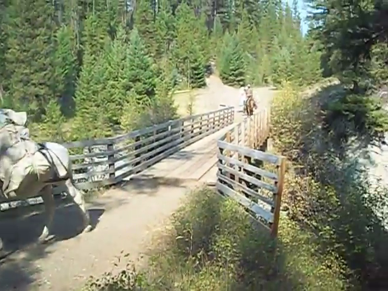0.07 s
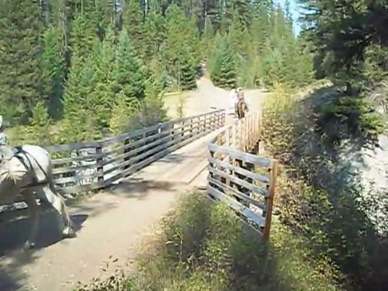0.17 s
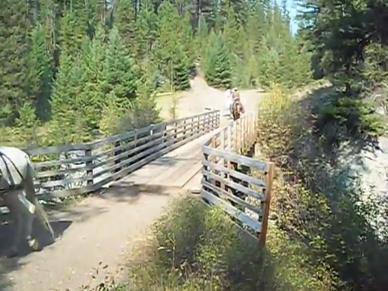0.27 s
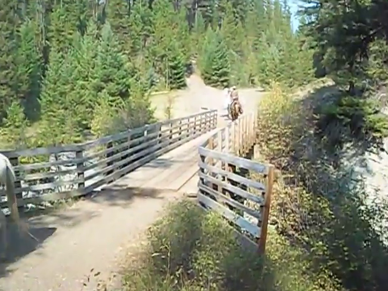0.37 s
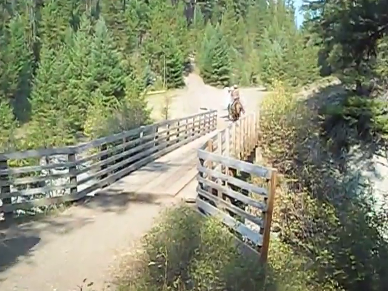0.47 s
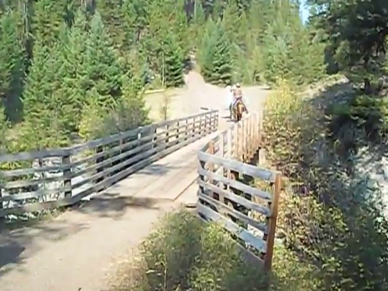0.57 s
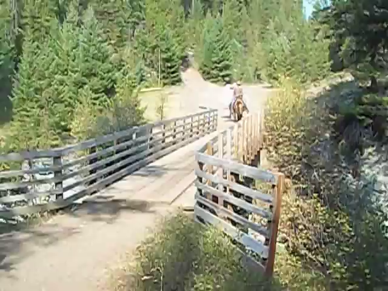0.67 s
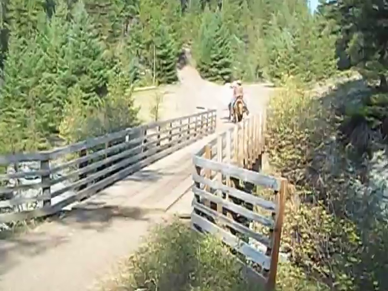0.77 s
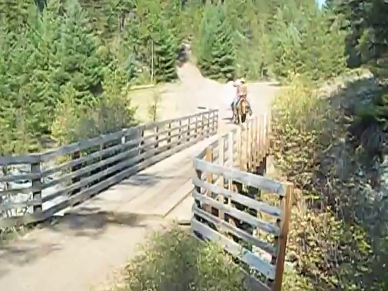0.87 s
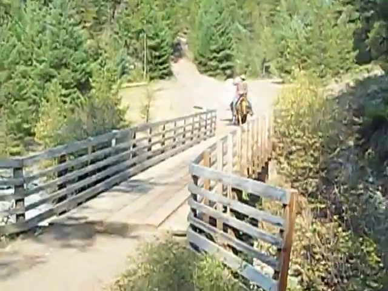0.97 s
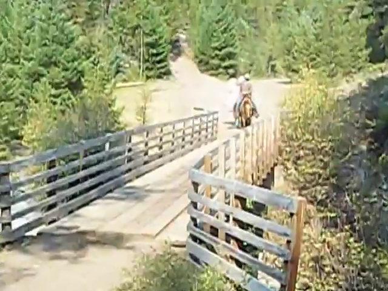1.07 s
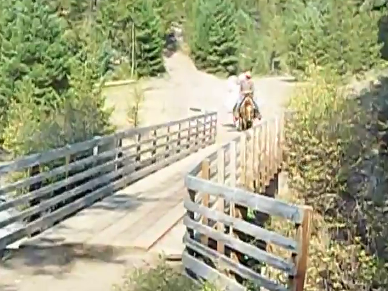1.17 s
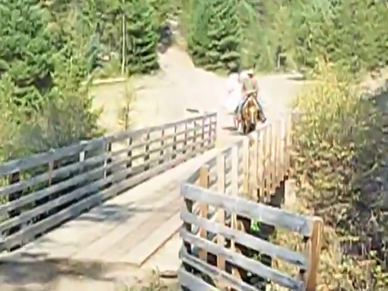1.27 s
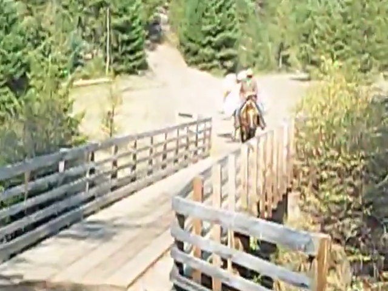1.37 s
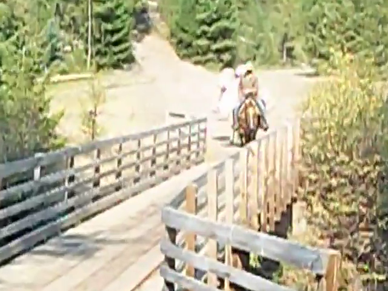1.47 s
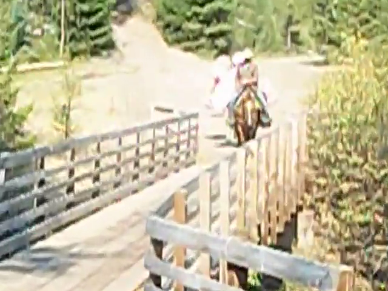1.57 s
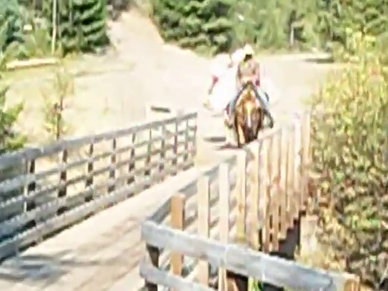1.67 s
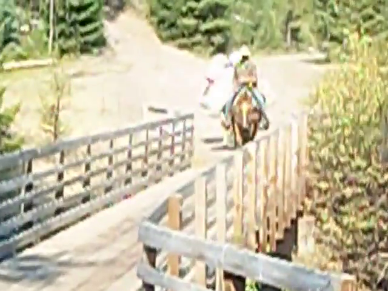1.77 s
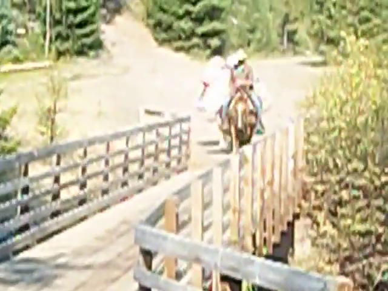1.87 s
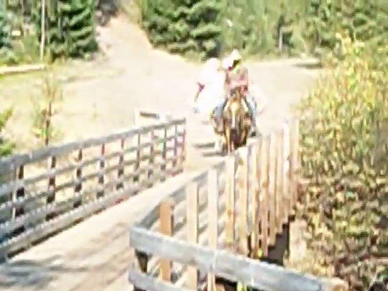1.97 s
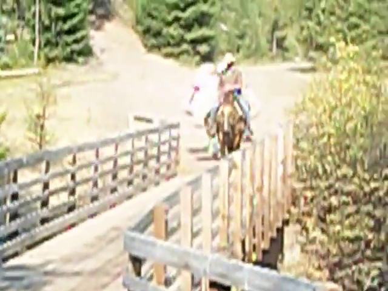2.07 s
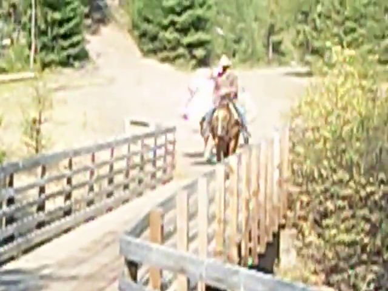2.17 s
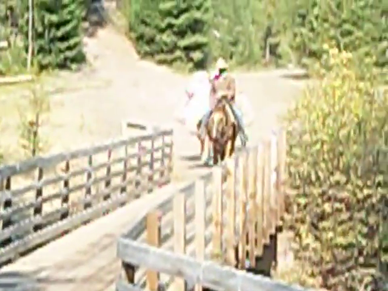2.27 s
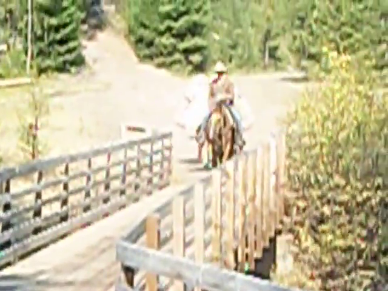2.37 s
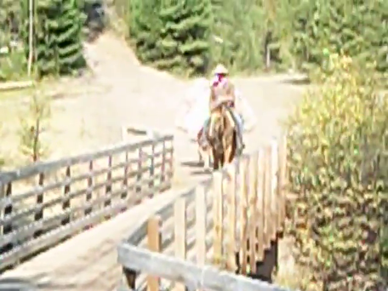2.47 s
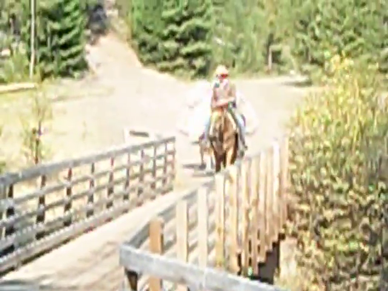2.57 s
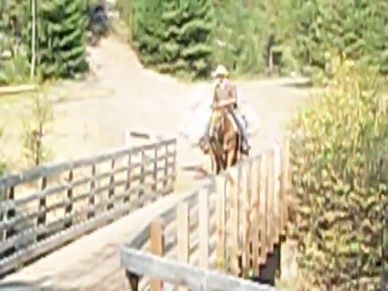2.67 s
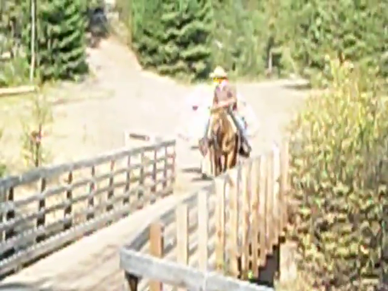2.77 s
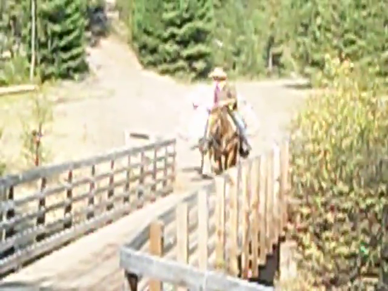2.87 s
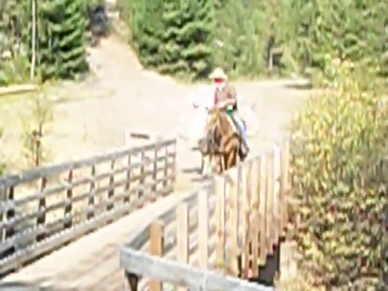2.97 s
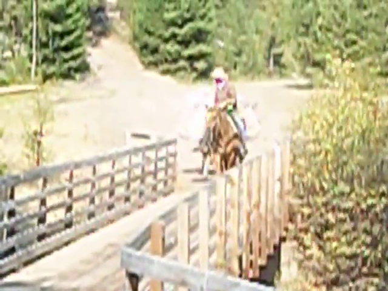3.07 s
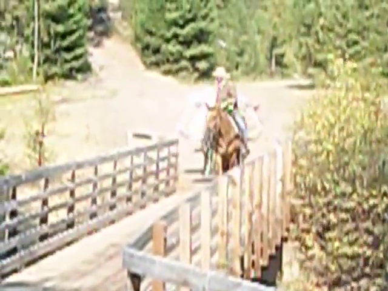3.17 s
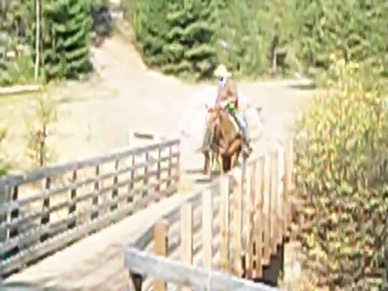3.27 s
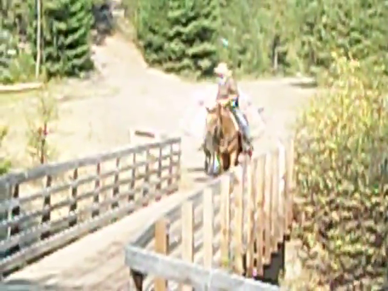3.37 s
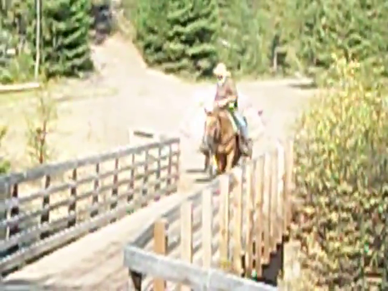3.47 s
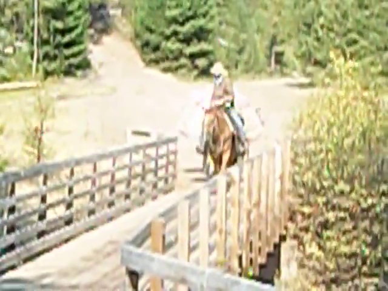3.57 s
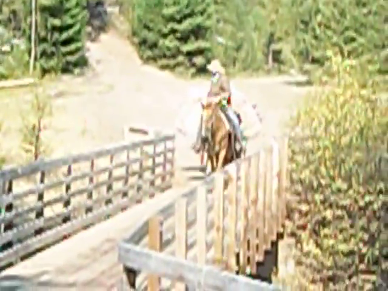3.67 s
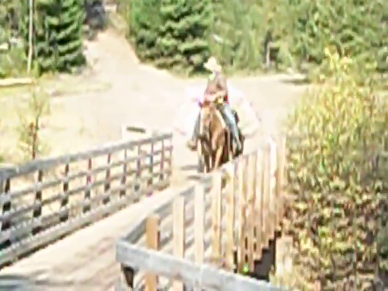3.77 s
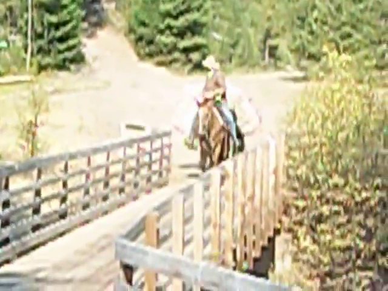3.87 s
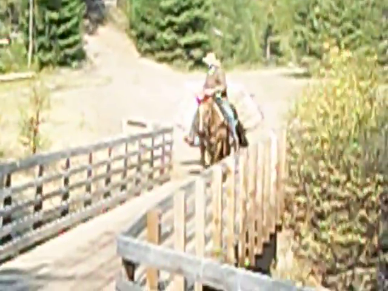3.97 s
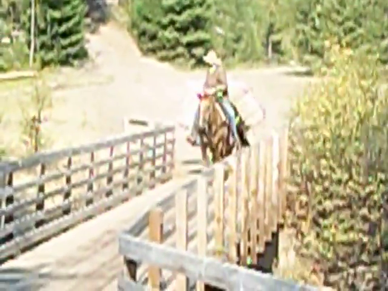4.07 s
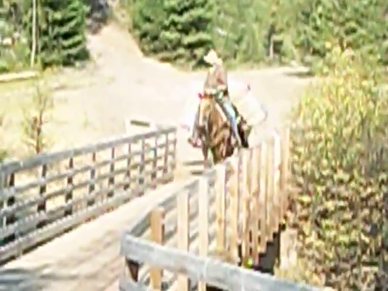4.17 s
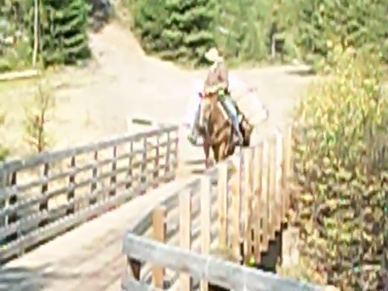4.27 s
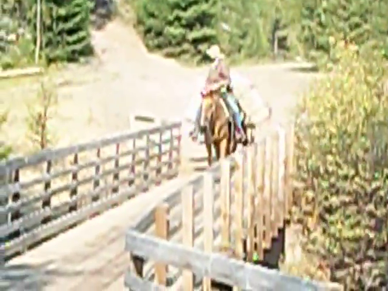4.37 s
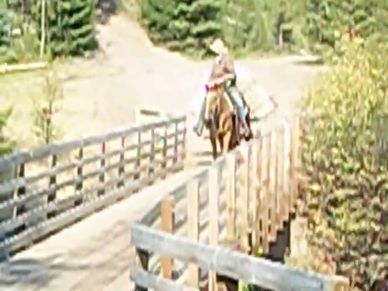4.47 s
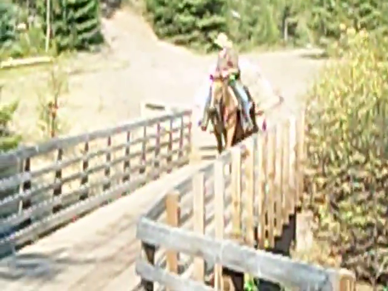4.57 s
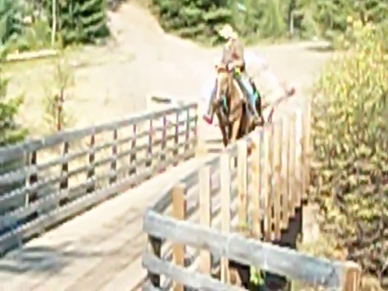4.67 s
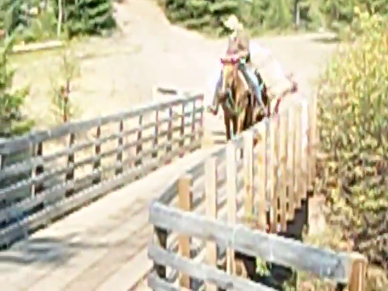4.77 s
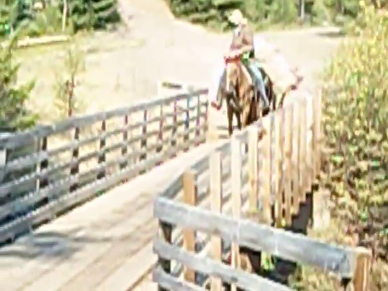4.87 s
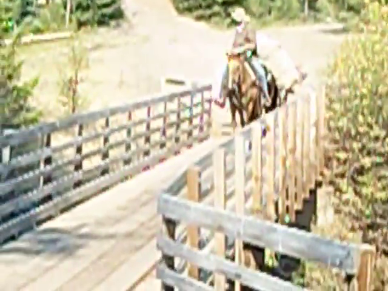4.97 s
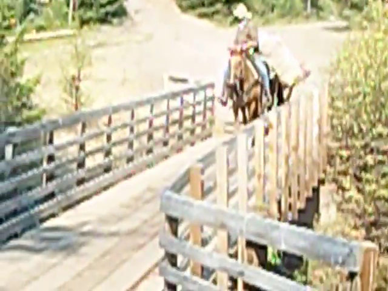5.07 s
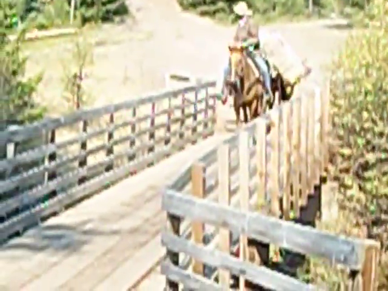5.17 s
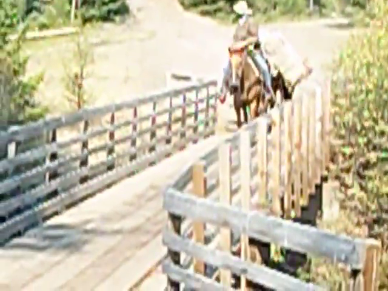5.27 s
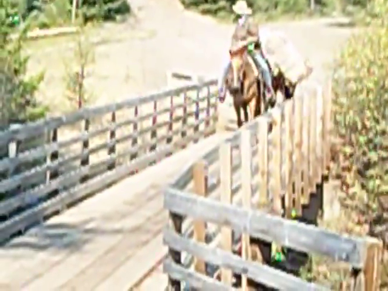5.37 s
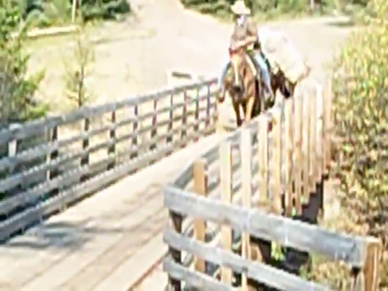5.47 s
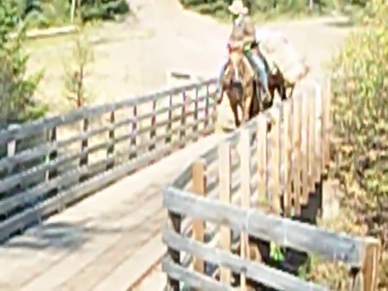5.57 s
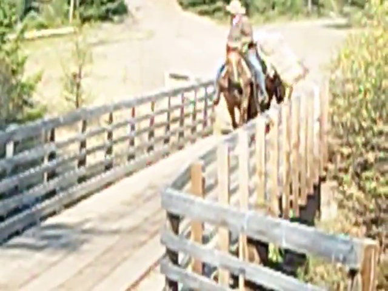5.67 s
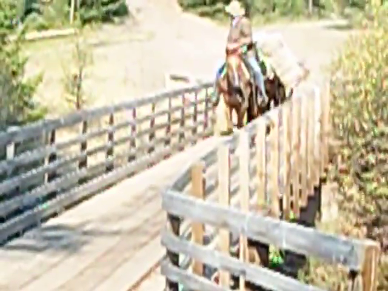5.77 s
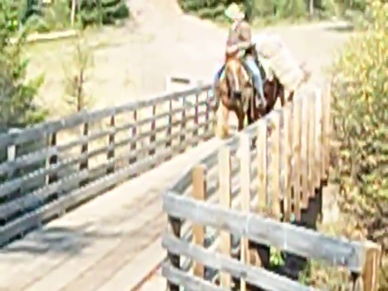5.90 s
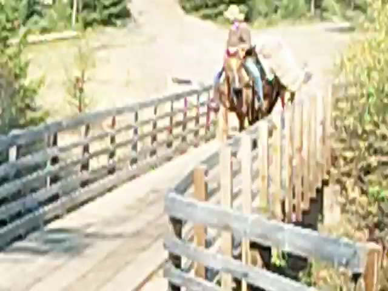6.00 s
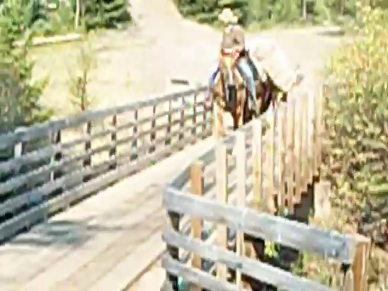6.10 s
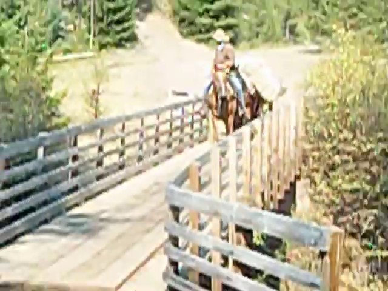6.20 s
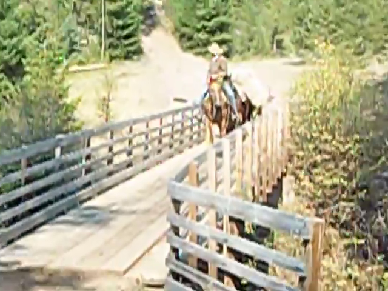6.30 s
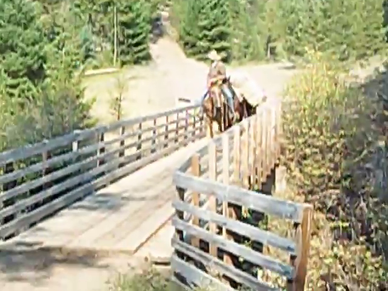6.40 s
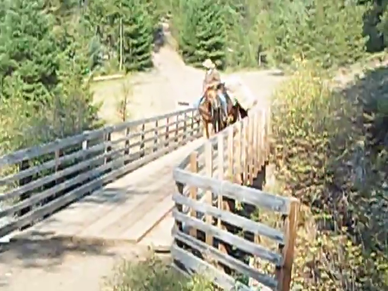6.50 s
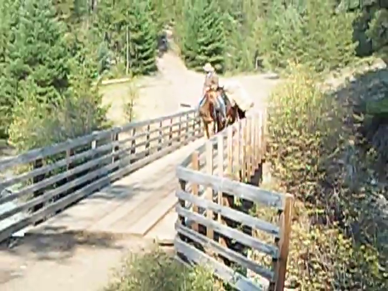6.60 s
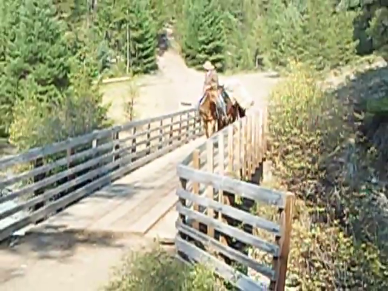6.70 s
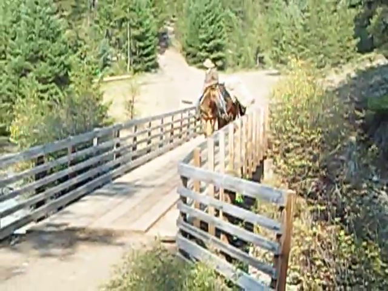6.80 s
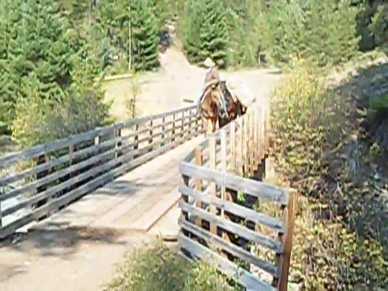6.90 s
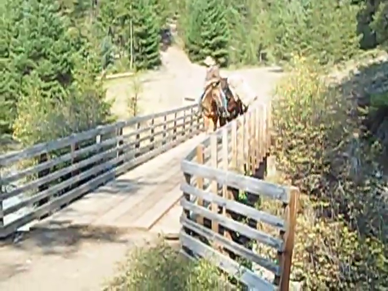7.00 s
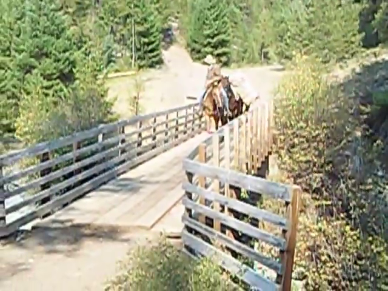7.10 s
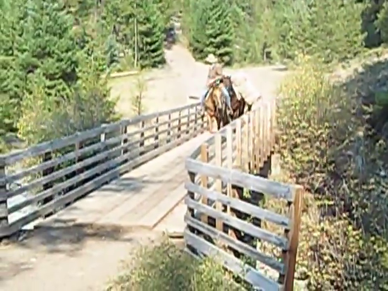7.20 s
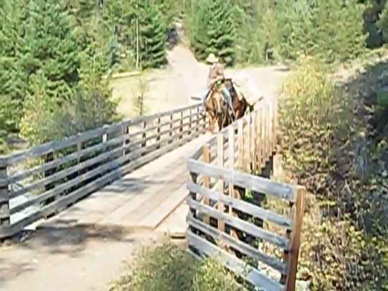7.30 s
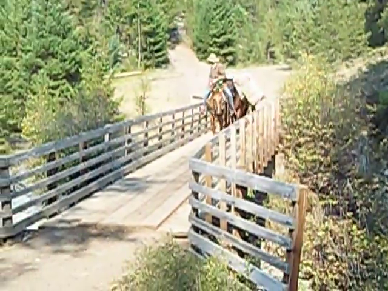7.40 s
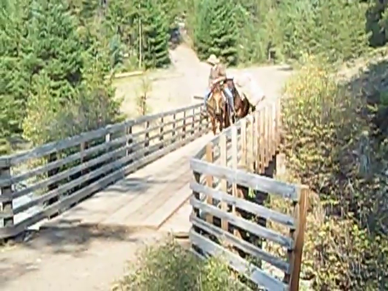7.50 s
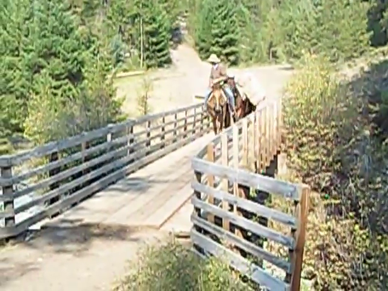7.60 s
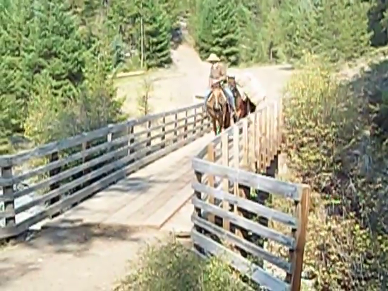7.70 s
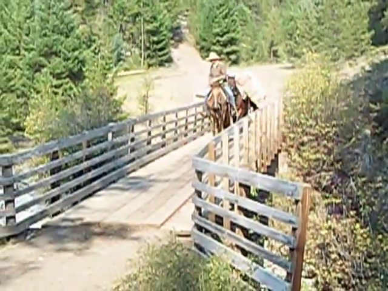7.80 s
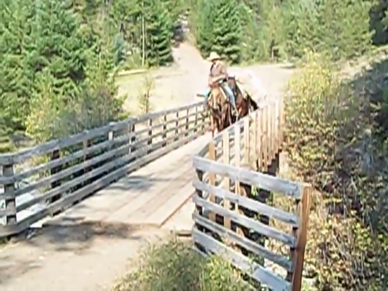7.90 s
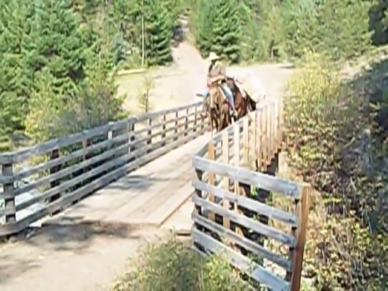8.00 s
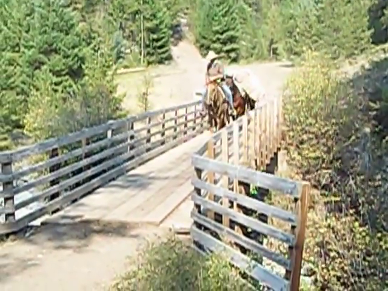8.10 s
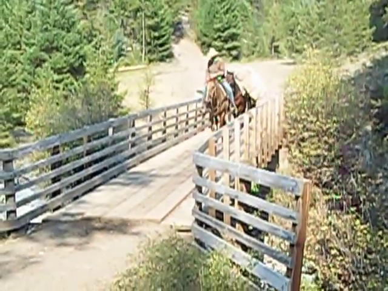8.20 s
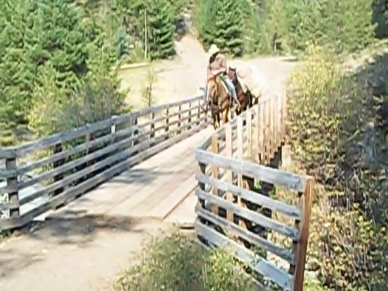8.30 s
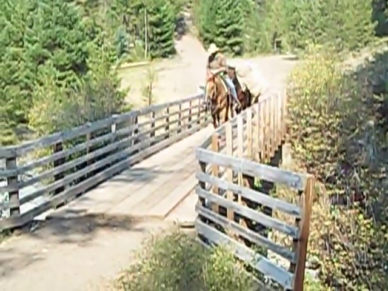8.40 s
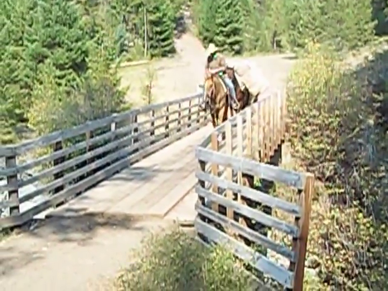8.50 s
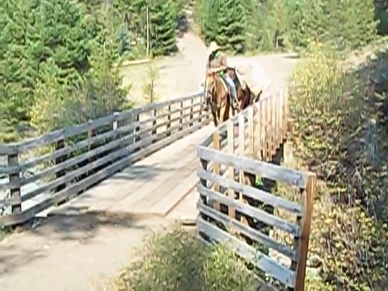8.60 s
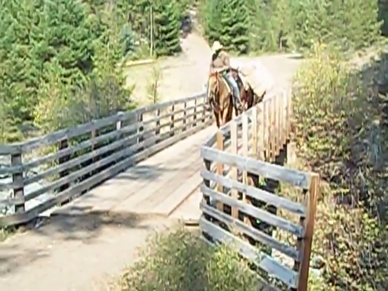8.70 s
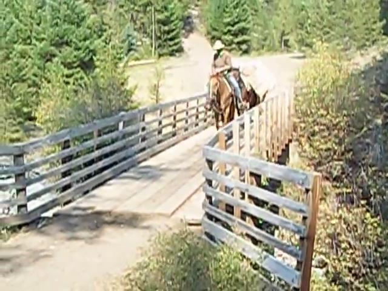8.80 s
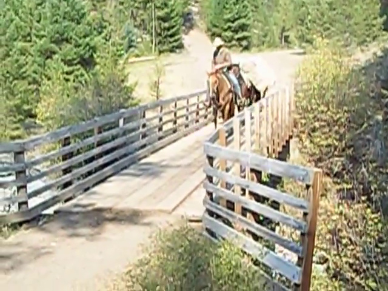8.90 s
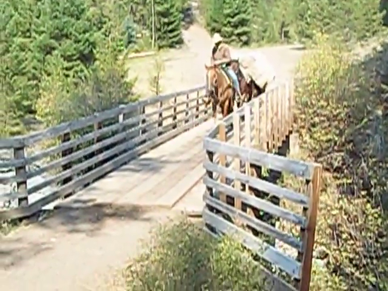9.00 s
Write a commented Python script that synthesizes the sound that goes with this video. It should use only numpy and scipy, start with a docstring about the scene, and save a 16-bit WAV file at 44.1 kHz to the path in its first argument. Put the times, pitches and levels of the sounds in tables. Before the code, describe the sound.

Outdoors by a creek, several horses walk on a plank bridge at an unhurried, overlapping pace. Faint gravel crunches and very loud close metal snaps open the scene; two more isolated clacks follow later. Distant soft hoof knocks gradually become heavy, booming thuds with woody clops, the deck rumbling underneath. Pebbly ticks and dry toe taps are scattered among them. The small microphone has little deep bass and no airy treble.

```python
"""Horses walk on a wooden plank bridge over a creek, just after a pack horse leaves over gravel.
Each hoof is a short blow that rings resonances: a hollow knock and a deeper thud.
Grit and sharp ticks sound under the hooves, toes tap the planks, and the forest sends back a dull echo.
Sharp clacks close by, perhaps a strap buckle, are snaps of ringing metal.
The creek is shaped noise, the gravel a crowd of tiny clicks; a small microphone narrows it all."""
import sys
import numpy as np
from scipy import signal
from scipy.fft import rfft, irfft
from scipy.io import wavfile
from scipy.ndimage import uniform_filter1d

SR = 44100
rng = np.random.default_rng(int(sys.argv[2]) if len(sys.argv) > 2 else 0)


def file_out(sig):
    """Save sig as 16-bit WAV at sys.argv[1]."""
    # one column per channel
    cols = np.atleast_2d(sig).T
    # limit, then scale
    lim = np.clip(cols, -1, 1)
    pcm = np.round(lim * 32767).astype(np.int16)
    wavfile.write(sys.argv[1], SR, pcm)


N = 399105  # length in samples, about 9 seconds
LEAD_S = 0.03  # time kept before each blow for the scuff


def from_db(db):
    """Turn decibels into a gain."""
    return 10 ** (np.asarray(db) / 20)


def rms_one(x):
    """Scale a sound to an average (rms) level of 1."""
    return x / np.sqrt(np.mean(x ** 2) + 1e-20)


def peak_one(x, size):
    """Scale a sound so that its loudest stretch of `size` samples has rms 1."""
    return x / np.sqrt(uniform_filter1d(x ** 2, size).max() + 1e-20)


def lowpass(x, order, hz):
    """Soften the treble above hz."""
    return signal.sosfilt(signal.butter(order, hz, fs=SR, output="sos"), x)


def add(out, s, sound):
    """Mix a sound in, starting at time s in seconds."""
    start = int(np.clip(round(s * SR), 0, N - 1))
    out[start:start + len(sound)] += sound[:N - start]


def drift(rate):
    """Wander at random: `rate` new values a second, joined by straight lines."""
    knots = rng.standard_normal(2000)
    return np.interp(np.arange(N) / SR * rate, np.arange(len(knots)), knots)


def resonate(x, hz, width_hz):
    """Ring one resonance, a two-pole filter with gain 1 at its top."""
    r = np.exp(-np.pi * width_hz / SR)
    feed = np.array([1, 0, -1]) * (1 - r * r) / 2
    feedback = [1, -2 * r * np.cos(2 * np.pi * hz / SR), r * r]
    return signal.lfilter(feed, feedback, x + 1e-18)


def contact(t60, rattle, scuff=0.0, scuff_s=0.013):
    """Make the force of a contact: a scuff swells into one blow, then a chatter dies by 60 dB in t60."""
    t = np.arange(SR // 2) / SR - LEAD_S
    noise = rng.standard_normal(len(t))
    after = t >= 0
    chatter = after * noise * from_db(-60 * np.abs(t) / max(t60, 0.003))  # at least 3 ms
    lead = ~after * noise * np.exp(-np.abs(t) / scuff_s)
    force = rattle * chatter / np.linalg.norm(chatter) + scuff * lead / np.linalg.norm(lead)
    force[np.argmax(after)] += 1  # the blow itself
    return force


def body(force, modes, centre_hz, focus, detune):
    """Ring an object's resonances, slightly mistuned; `focus` dB are lost per octave from the centre."""
    shifts = np.exp(detune * rng.standard_normal(len(modes)))
    out = np.zeros(len(force))
    for k, (hz, width_hz, db) in enumerate(modes):
        gain = from_db(db - focus * np.abs(np.log2(hz / centre_hz)))
        out += (-1) ** k * gain * resonate(force, hz * shifts[k], width_hz)
    return out


def blows(rows, modes, rattle, scuff, focus, detune, size):
    """Strike an object once per row; long, dragging contacts scuff more before they land."""
    out = np.zeros(N)
    for s, db, hz, t60 in rows:
        force = contact(t60, rattle, scuff * np.sqrt(t60))
        sound = body(force, modes, hz, focus, detune)
        add(out, s - LEAD_S, from_db(db) * peak_one(sound, size))
    return out


# The colour of the creek's rush.
# Each row: pitch in Hz, relative strength in dB per Hz.
CREEK_COLOUR = [(15, -38.5), (25, -13), (43, -1), (88, -2), (145, -1), (336, -2), (506, -6.5), (875, 1.5),
                (1320, -11.5), (2080, -11.5), (2670, -10), (3940, -18), (4620, -16), (5060, -19.5),
                (5800, -44.5), (7540, -66.5), (12800, -120)]


def creek(flutter_db=1.33, low_cut_hz=110):
    """Running water: a soft rush of noise whose octaves swell independently."""
    hz = np.maximum(np.arange(N // 2 + 1) * SR / N, 1)
    points_hz, points_db = np.transpose(CREEK_COLOUR)
    colour = from_db(np.interp(np.log(hz), np.log(points_hz), points_db))
    colour = colour * hz / np.hypot(hz, low_cut_hz)  # thin out the bass
    rush = rfft(rng.standard_normal(N)) * colour
    octave = np.clip(np.floor(np.log2(hz)), 6, 12)
    out = np.zeros(N)
    for k in np.unique(octave):
        out += irfft(rush * (octave == k), N) * from_db(flutter_db * drift(22))
    return rms_one(out)


# How loudly gravel crunches on the track over time.
# Each row: time in seconds, relative level in dB.
GRAVEL_LEVEL = [(0, -41.5), (0.3, -43), (1.7, -39.5), (2.1, -47.5), (2.4, -38.5), (3.7, -45), (9.05, -48.5)]


def gravel(per_s=260, spread_db=0.5, clump_db=6.5, trim_db=-8.5):
    """Small stones shift in clumps, each a short click at one of twelve pitches."""
    sizes = from_db(spread_db * np.minimum(rng.exponential(1, N), 4)) * rng.choice([-1, 1], N)
    chance = per_s * from_db(clump_db * drift(14)) / SR
    grains = sizes * (rng.random(N) < chance)
    pitches = np.geomspace(1200, 5200, 12)  # Hz
    dealt = rng.integers(0, len(pitches), N)
    crunch = np.zeros(N)
    for k, hz in enumerate(pitches):
        crunch += resonate(grains * (dealt == k), hz, hz / 6) / hz
    times, levels_db = np.transpose(GRAVEL_LEVEL)
    level_db = np.interp(np.arange(N) / SR, times, levels_db) + trim_db
    return from_db(level_db) * rms_one(crunch)


# Out on the open span the deck rings longer and trembles more, and less grit lies on it.
# Each row: time in seconds, time in seconds for a 140 Hz thud's rattle to fall 60 dB,
# tremor level in dB, relative grit level in dB.
ALONG_BRIDGE = [(0, 0.12, -66, -34), (1.999, .13, -57, -35), (3.2, .26, -49, -39), (6.0, 0.24, -43, -48),
                (9.05, 0.31, -37, -49)]


def deck_at(s):
    """Look up rattle time, tremor and grit where the horses are at time s."""
    times, *columns = np.transpose(ALONG_BRIDGE)
    return [np.interp(s, times, column) for column in columns]


# The low resonances of the whole deck, also used by the thuds and toe taps.
# Each row: pitch in Hz, width in Hz, relative level in dB.
DECK_MODES = [(55, 20, -2), (94.5, 18, -1), (135, 30.7, -0.5), (178.3, 71, -4), (273, 160, -5.5),
              (384, 152, -5.5)]


def rumble(swell_db=5.0, centre_hz=110, focus=4.0):
    """Under the walking horses the deck never quite comes to rest: swelling noise rings it."""
    tremor = rng.standard_normal(N) * from_db(swell_db * drift(23))
    level_db = deck_at(np.arange(N) / SR)[1]
    return from_db(level_db) * rms_one(body(tremor, DECK_MODES, centre_hz, focus, 0))


def forest(x, t60=0.66, dull_hz=1500):
    """Trunks and banks scatter back a dull, thin echo: fading noise, convolved with the sound."""
    t = np.arange(SR) / SR
    echoes = rng.standard_normal(SR) * from_db(-60 * t / t60) * (1 - np.exp(-t / 0.025))
    echoes = lowpass(echoes / np.linalg.norm(echoes), 1, dull_hz)
    return signal.fftconvolve(x, echoes)[:N]


# Distinct hoof steps: first a pack horse leaving over gravel, then horses on the deck.
# Each row: time in seconds, relative clop level in dB, relative thud level in dB,
# centre pitch of the thud in Hz.
DISTINCT_STEPS = [(0.079, -25, -43, 250), (0.351, -34.5, -30, 282), (0.392, -29.5, -41, 300),
                  (0.45, -27, -43, 300), (0.484, -25.5, -42.5, 250), (0.623, -29.5, -47, 250),
                  (0.745, -30, -44, 252), (1.031, -31, -28, 260), (1.213, -33, -28, 190),
                  (1.296, -30.5, -26.5, 205), (1.331, -28, -38, 250), (1.504, -31, -39, 266),
                  (1.645, -32.5, -26.5, 287), (1.984, -31, -38, 223), (2.096, -31.5, -29, 266),
                  (2.138, -31, -29, 155), (2.207, -31, -24, 191), (2.46, -43, -32.5, 189),
                  (2.692, -31, -24.5, 85), (2.972, -29, -24.5, 348), (2.996, -30.5, -32, 130),
                  (3.276, -34.5, -25.5, 75), (3.547, -38.5, -31, 130), (3.831, -23.5, -28.5, 62),
                  (4.094, -35, -33, 165), (4.32, -29, -27, 135), (4.477, -32, -33.5, 254),
                  (4.54, -29, -31.5, 69), (4.629, -31.5, -25, 135), (4.732, -39, -32, 252),
                  (4.815, -26.5, -28.5, 173), (4.852, -30, -37.5, 168), (5.015, -30, -33, 109),
                  (5.123, -29, -39.5, 148), (5.29, -27.5, -27.5, 120), (5.312, -26.5, -27, 280),
                  (5.384, -33, -33.5, 266), (5.55, -32.5, -23.5, 105), (5.777, -33, -29.5, 131),
                  (5.925, -41.5, -26.5, 187), (6.054, -27.5, -30, 135), (6.235, -31, -25, 75),
                  (6.253, -17, -24, 200), (6.529, -33.5, -29.5, 95), (6.574, -22.5, -27.5, 200),
                  (6.743, -37.5, -27.5, 190), (6.894, -23, -23.5, 163), (7.203, -37, -29.5, 113),
                  (7.281, -26, -23, 123), (7.527, -19.5, -19, 135), (7.82, -25.5, -27.5, 232),
                  (7.845, -27.5, -23.5, 140), (8.033, -34, -26.5, 124), (8.138, -19.5, -19, 140),
                  (8.157, -20, -31, 130), (8.221, -16, -25, 230), (8.438, -37, -26.5, 140),
                  (8.523, -23, -22.5, 135), (8.787, -25.5, -19, 141), (8.801, -26, -30, 152)]


def footfalls(pace_s=0.29, sway_s=0.03):
    """Place light steps of the following horses, at a nearly even pace, among the distinct ones."""
    beats = np.arange(pace_s, N / SR, pace_s)
    times = beats + sway_s * rng.standard_normal(len(beats))
    light = [(s, -42, -43.5, 220) for s in times]  # same columns as the distinct steps
    return list(DISTINCT_STEPS) + light


def thuds(steps, level_db=-0.45):
    """The low thud of each step: a blow rings low resonances and rattles on, shorter at high pitch."""
    rows = []
    for s, _, db, hz in steps:
        t60 = deck_at(s)[0] * (140 / hz) ** 0.15
        rows.append((s, db, hz, t60))
    knocks = blows(rows, DECK_MODES, rattle=1.34, scuff=0.8, focus=7.8, detune=0.04, size=350)
    return from_db(level_db) * knocks


# The resonances of a single plank, also used by the toe taps.
# Each row: pitch in Hz, width in Hz, relative level in dB.
PLANK_MODES = [(504, 160, -7.5), (696, 227, 0.5), (813, 289, 0.5), (940, 147, -3.5), (1350, 330, -25)]


def clops(steps, level_db=0.65, dull_hz=1400, pitch_hz=723, rattle_t60_s=0.13):
    """The hollow knock of each step rings plank resonances; soft wood gives little treble."""
    rows = [(s, db, pitch_hz, rattle_t60_s) for s, db, _, _ in steps]
    knocks = blows(rows, PLANK_MODES, rattle=1.06, scuff=1.3, focus=7.0, detune=0.05, size=180)
    return from_db(level_db) * lowpass(knocks, 2, dull_hz)


# The resonances used for ground grit and sharp ticks.
# Each row: pitch in Hz, width in Hz, relative level in dB.
GRIT_MODES = [(905, 360, -1.6), (1680, 760, 0.91), (2624, 250, 0.93), (3860, 800, -1.7), (4530, 960, -4)]

# Sharp ticks under the hooves: pebbles cracking, and a few woody knocks.
# Each row: time in seconds, relative peak level in dB, centre pitch in Hz.
SHARP_TICKS = [(0.3115, -33.5, 2880), (0.4878, -33, 2530), (0.587, -27.5, 2740), (0.673, -33, 2070),
               (0.885, -34, 3250), (1.0, -31, 1500), (1.018, -30, 2000), (1.201, -32, 2220),
               (1.288, -29, 2500), (1.3303, -29.5, 1800), (1.644, -28, 3450), (2.239, -32.5, 3720),
               (2.565, -30, 2400), (2.67, -29, 2570), (2.752, -28.5, 2550), (3.2641, -28.5, 2300),
               (3.586, -33.5, 2470), (4.0804, -28.5, 3200), (4.268, -25, 2100), (4.9174, -21, 1650),
               (5.126, -32, 1510), (6.038, -31, 2410), (6.057, -33.5, 2630), (6.174, -33.5, 4520),
               (6.2402, -20.5, 1720), (6.4865, -30, 2400), (8.445, -32.5, 1700)]


def ticks(steps, level_db=1.7, top_ratio=2.3, grind_hz=2400, grind_t60_s=0.09, tick_t60_s=0.042):
    """Each given step grinds a little grit; sharp ticks join in, duller the lower their pitch."""
    rows = [(s, deck_at(s)[2], grind_hz, grind_t60_s) for s, *_ in steps]
    out = blows(rows, GRIT_MODES, rattle=1.0, scuff=0.69, focus=15.0, detune=0.057, size=90)
    for s, db, hz in SHARP_TICKS:
        force = contact(tick_t60_s, rattle=1.0, scuff=0.12)
        tick = body(force, GRIT_MODES, hz, focus=14.0, detune=0.04)
        tick = lowpass(tick, 2, min(top_ratio * hz, SR / 3))
        add(out, s - LEAD_S, from_db(db) * peak_one(tick, size=90))
    return from_db(level_db) * out


# The short resonances of the metal.
# Each row: pitch in Hz, width in Hz, relative level in dB.
METAL_MODES = [(610, 360, -6), (1030, 330, -2.5), (1680, 710, -3.5), (2070, 370, -2), (2550, 320, -7.5),
               (3080, 225, -6), (3634, 410, -9), (4410, 270, -5), (5170, 250, 1)]

# The metal's lingering ring.
# Each row: pitch in Hz, relative level in dB, time in seconds to fall 60 dB.
RING_MODES = [(1665, -2, .12), (3155, -3, .11), (4970, 3, .04), (5235, -1, .14), (5790, -13, .14)]

# Metal clacking close by.
# Each row: time in seconds, relative peak level in dB, centre pitch in Hz,
# time in seconds for the chatter to fall 60 dB (at least 0.003 is used), ring against the snap in dB.
METAL_CLACKS = [(0.1323, -4.5, 1200, 0.002, -32), (0.1343, 5, 1610, 0.010, -31),
                (0.173, -15, 1300, 0.016, -24.5), (0.2204, -10.5, 1350, 0.02, -28),
                (0.2308, -25, 1890, .025, -23), (1.72, -18, 2100, 0.015, -32),
                (1.723, -6, 2900, 0.01, -28.5), (1.7343, -24, 1920, 0.012, -18),
                (6.6948, -23, 4500, 0.014, -26), (6.7007, -24, 3500, 0.029, -22),
                (6.7058, -31, 2200, 0.011, -17), (6.7179, -7.5, 2800, 0.019, -15)]


def clacks(level_db=0.36, rattle=1.6, focus=4.44):
    """Metal snaps against metal, chatters for milliseconds and rings faintly as fading sine tones."""
    out = np.zeros(N)
    t = np.arange(SR // 2) / SR
    for s, db, centre_hz, chatter_t60, ring_db in METAL_CLACKS:
        snap = body(contact(chatter_t60, rattle), METAL_MODES, centre_hz, focus, 0.014)
        ring = np.zeros(len(t))
        for hz, mode_db, t60 in RING_MODES:
            fade_db = mode_db - focus * abs(np.log2(hz / centre_hz)) - 60 * t / t60
            ring += from_db(fade_db) * np.sin(2 * np.pi * hz * t)
        add(out, s - LEAD_S, from_db(db) * peak_one(snap, size=90))
        add(out, s, from_db(db + ring_db) * ring)
    return from_db(level_db) * out


# A toe taps a plank, short and dry.
# Each row: time in seconds, peak level in dB before the treble is softened, centre pitch in Hz.
TOE_TAPS = [(1.863, -16.5, 227), (2.622, -26, 483), (2.908, -29, 263), (3.032, -25, 747),
            (3.262, -28.5, 534), (3.91, -25, 840), (3.996, -21, 710), (4.268, -18, 773), (4.916, -27, 930),
            (7.769, -24.5, 933), (8.295, -21, 727), (8.445, -19.5, 436)]


def taps(dull_hz=2600, rattle_t60_s=0.03):
    """A toe strikes plank and deck with no weight behind it, so little rattles."""
    rows = [(s, db, hz, rattle_t60_s) for s, db, hz in TOE_TAPS]
    modes = list(DECK_MODES) + list(PLANK_MODES)
    knocks = blows(rows, modes, rattle=0.67, scuff=0.3, focus=12.0, detune=0.035, size=180)
    return lowpass(knocks, 2, dull_hz)


def scene(creek_db=-37.4, echo_db=-12):
    """Mix the hooves and their echo, the near clacks, the creek and the gravel."""
    bed = from_db(creek_db) * creek() + gravel()
    steps = footfalls()
    hooves = rumble() + thuds(steps) + clops(steps) + ticks(DISTINCT_STEPS) + taps()
    echo = from_db(echo_db) * forest(hooves)
    return (hooves + echo + clacks() + bed)[None]


def record(dry):
    """A small microphone: no deep bass, almost nothing above 7 kHz, and peaks that flatten."""
    treble_cut = signal.cheby2(14, 70, 7000, fs=SR, output="sos")
    thin = signal.sosfilt(signal.butter(2, 20, "high", fs=SR, output="sos"), dry)
    narrow = signal.sosfilt(treble_cut, thin)
    flattened = 0.92 * np.tanh(narrow / 0.92)
    return signal.sosfiltfilt(treble_cut, flattened)  # remove the treble that flattening adds


dry = scene()
out = record(dry)
file_out(out)
```